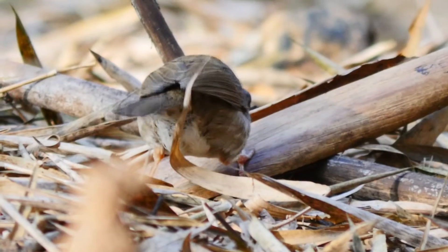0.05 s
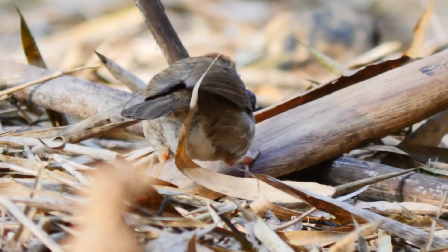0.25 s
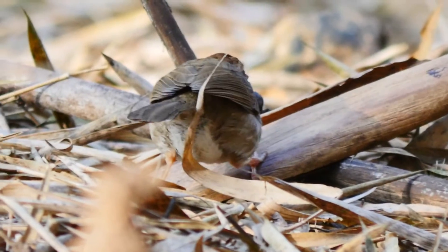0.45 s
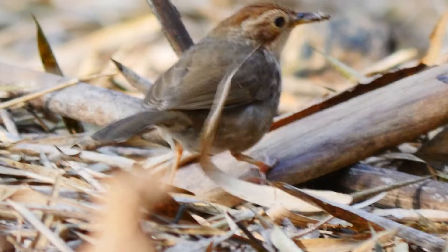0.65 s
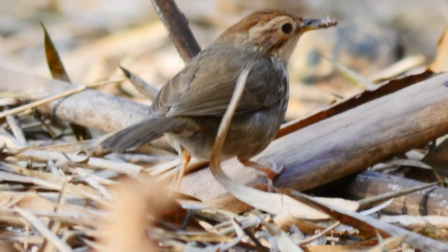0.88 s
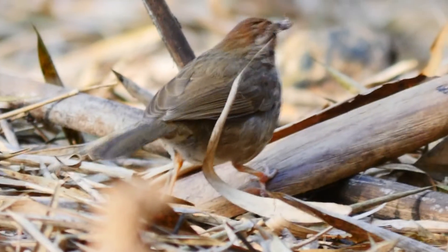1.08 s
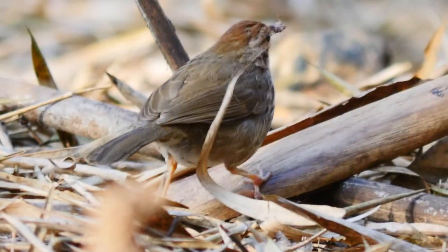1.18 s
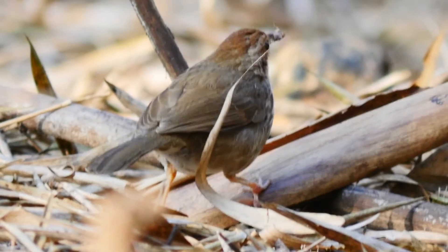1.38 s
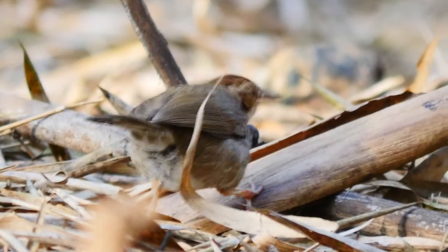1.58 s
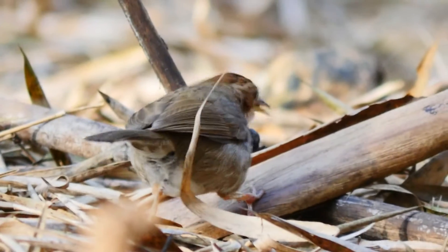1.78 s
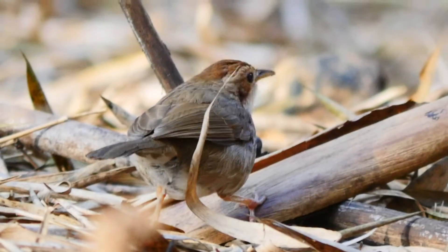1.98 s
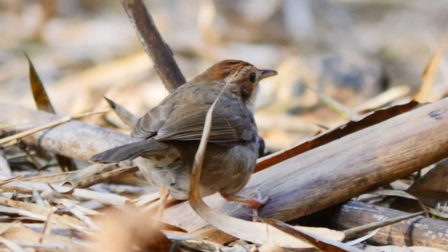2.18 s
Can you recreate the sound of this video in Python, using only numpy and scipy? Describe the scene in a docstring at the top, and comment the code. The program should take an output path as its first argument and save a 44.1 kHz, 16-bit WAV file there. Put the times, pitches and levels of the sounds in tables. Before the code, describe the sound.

A small bird forages close by in dry leaf litter, rustling, snapping a leaf, then shuffling with tiny cracks. Distant birds whistle and chirp faintly through the forest over a steady low rumble and a soft hiss of air.

```python
"""From the start, a steady far rumble and a faint hiss of air lie under distant birds, whose whistles
and chirps are scattered by the trees. Close by, a small bird forages in dry leaf litter.
At about 0.7 s it tugs at a leaf, which snaps, while a few low hoots sound far off on the left.
From about 1.3 s it shuffles and hops, with rustles and small cracks, as the far birds sing on."""
import sys
import numpy as np
from scipy import signal
from scipy.fft import rfft, irfft
from scipy.io import wavfile

SR = 44100
rng = np.random.default_rng(int(sys.argv[2]) if len(sys.argv) > 2 else 0)


def generate_wav(signal):
    """Clip the signal to [-1, 1] and save it as 16-bit WAV at the path in sys.argv[1]."""
    frames = np.transpose(np.atleast_2d(signal))
    scaled = np.clip(frames, -1, 1) * 32767
    pcm = np.round(scaled).astype(np.int16)
    wavfile.write(sys.argv[1], SR, pcm)


N = 99225  # 2.25 s
T = np.arange(N) / SR


def from_db(db):
    """Turn decibels into a number to multiply by."""
    return 10 ** (np.asarray(db) / 20)


def rms_one(x):
    """Scale a signal so that its average power is 1."""
    return x / np.sqrt(np.mean(x ** 2) + 1e-20)


def pan(db):
    """Share a sound between the ears: plus is to the left, minus to the right."""
    return rms_one(from_db([[db / 2], [-db / 2]]))


def drift(per_s):
    """A random wobble, about 1 in size, that heads for a new value per_s times a second."""
    return rms_one(np.interp(T * per_s, np.arange(N), rng.standard_normal(N)))


def colour(x, points):
    """Make some frequencies stronger and others weaker; white noise keeps its power."""
    size = 2 ** 17
    hz, db = np.transpose(points)
    bin_hz = np.arange(size // 2 + 1) * SR / size
    gain = rms_one(from_db(np.interp(np.log(bin_hz + 1), np.log(hz), db)))
    # these steps make the filter ring only after a sound, never before it
    cepstrum = irfft(np.log(gain))
    cepstrum[1:size // 2] *= 2
    cepstrum[size // 2 + 1:] = 0
    return irfft(rfft(x, size) * np.exp(rfft(cepstrum)))[..., :N]


def stereo_noise(likeness):
    """White noise for two ears: likeness 1 is the same in both, 0 unrelated, -1 opposite."""
    mid, side = rng.standard_normal((2, N))
    return np.sqrt((1 + likeness) / 2) * mid + np.sqrt((1 - likeness) / 2) * side * [[1], [-1]]


# tone of the far rumble: f/Hz, relative level/dB
RUMBLE_TONE = [(20, -48), (45, -27.5), (70, -9), (100, -2.5), (140, -1.5), (170, -4), (200, 0.5), (245, -3),
               (320, -9), (550, -11.5), (850, -16.5), (1500, -42.5), (4000, -34.5)]
# tone of the hiss of air: f/Hz, relative level/dB
AIR_TONE = [(100, -9.5), (500, 1.5), (850, 0.5), (1100, 8), (1500, -3), (2000, -1.5), (3100, -1.5),
            (4000, -11), (5200, -15), (7000, -6), (10000, -50), (16000, -24.5)]
def background():
    """A steady far rumble in the middle and the wide, faint hiss of the forest air."""
    rumble = from_db(-51.5) * colour(stereo_noise(1), RUMBLE_TONE)
    air = from_db(-56.5) * pan(-2.5) * colour(stereo_noise(-0.18), AIR_TONE)
    return rumble + air


# how loud the farthest birds are: t/s, level/dB
CHATTER_LOUDNESS = [(0, -58), (.2, -67), (.32, -56.5), (.48, -61), (.6, -61), (1.05, -58), (1.3, -59.5),
                    (1.45, -57.5), (1.6, -55.5), (1.76, -61), (1.97, -58), (2.25, -69)]
# tone of their chatter: f/Hz, relative level/dB
CHATTER_TONE = [(2400, -36.5), (3400, -2), (4000, 2.5), (4600, -3.5), (5400, -5.5), (6800, -25)]
def chatter():
    """The farthest birds blur into a soft wash of noise."""
    loudness = from_db(np.interp(T, *np.transpose(CHATTER_LOUDNESS)))
    return loudness * colour(stereo_noise(0), CHATTER_TONE)


def tree_echo(x, fade_s=0.85, build_s=0.009):
    """Countless small echoes off the trees build up, then die away by 60 dB in fade_s."""
    tail = stereo_noise(0) * from_db(-60 * T / fade_s) * (1 - np.exp(-T / build_s))
    return signal.fftconvolve(x, rms_one(tail) / np.sqrt(N), axes=-1)[:, :N]


def whistle(start, length, pitches, waver, fade_s=0.01):
    """One almost pure note that bends through three pitches and fades in and out."""
    progress = np.clip((T - start) / length, 0, 1)
    bend = np.polyfit([0, .5, 1], pitches, 2)
    hz = np.polyval(bend, progress) * (1 + waver)
    fade = np.clip(np.minimum(progress, 1 - progress) * length / fade_s, 0, 1)
    return np.sqrt(2) * np.sin(np.pi / 2 * fade) * np.sin(2 * np.pi * np.cumsum(hz) / SR)


# whistled notes: t/s, length/s, first f/Hz, middle f/Hz, last f/Hz, level/dB,
# left over right/dB, echo compared with the note/dB, waver/share of the pitch
WHISTLES = [(0.0, 0.089, 7330, 7330, 7500, -63, 2, -19, 0.0087),
            (0.287, 0.071, 3600, 3974, 4070, -58.5, 4, 2, .03),
            (.375, 0.05, 4700, 4320, 3620, -58, 11, 7, 0.023),
            (0.511, 0.033, 2956, 2450, 2480, -53.5, -20, 1, 0.028),
            (0.554, 0.049, 2600, 2458, 2650, -51.5, -8, 1.5, 0.03),
            (0.639, 0.053, 4340, 3977, 3340, -54, 10, 7, 0.011),
            (0.708, 0.049, 1700, 1856, 2230, -51.5, -12, 2, 0.035),
            (0.82, 0.047, 2590, 2608, 2580, -40, -16, -8, 0.0047),
            (0.874, 0.033, 2620, 2595, 2640, -47.5, 2, 2.5, 0.0029),
            (0.919, 0.031, 3456, 3433, 3460, -55, 18, 2.5, 0.015),
            (.935, 0.0535, 2050, 1610, 1680, -48, -13.5, -5, .02),
            (0.981, 0.044, 2000, 2200, 2120, -56, -8, 7, 0.025),
            (1.015, 0.05, 2620, 2600, 2624, -56.5, 2, -8, 0.012),
            (1.131, 0.036, 2475, 2990, 2450, -51.5, -12, 0, 0.0083),
            (1.181, 0.061, 3510, 3740, 4400, -64.5, 13, 4, .02),
            (1.263, .06, 2500, 2750, 2900, -60, 11, 0, .04),
            (1.41, 0.027, 1970, 2000, 2010, -57.5, -11, -3, 0.014),
            (1.389, 0.025, 3986, 4210, 4300, -56, 0, 6, 0.041),
            (1.411, 0.026, 3550, 4000, 4050, -53, -1, -1, 0.025),
            (1.433, 0.017, 4500, 4610, 4850, -52, 0, 3, 0.064),
            (1.482, 0.0165, 4170, 4540, 5070, -53, 3, 1, 0.018),
            (1.498, 0.034, 3244, 3870, 3880, -54, 1, 2.5, 0.0157),
            (1.503, 0.049, 1950, 1948, 2230, -59, -3, -1, 0.0131),
            (1.533, 0.0205, 3900, 4185, 4580, -47, -3, -3.5, 0.036),
            (1.555, 0.039, 4200, 4154, 3840, -55, -5, 4.5, 0.0507),
            (1.5, 0.25, 6800, 6980, 7080, -74.5, 11, 3, 0.008),
            (1.952, 0.24, 6900, 7130, 7480, -65.5, -2, -8, 0.006),
            (2.131, 0.1, 7380, 7570, 7650, -62.5, 1, -7, 0.0083),
            (2.084, 0.056, 4340, 3990, 3460, -62.5, 13, 8.5, 0.019),
            (2.116, 0.032, 5500, 4010, 2240, -59, -8, 5, 0.072),
            (2.12, 0.0347, 2816, 2504, 2480, -58, -10, 1.5, 0.021)]
# a run of low, falling hoots on the left: t/s, level/dB
LOW_HOOTS = [(0.658, -52), (0.687, -50.5), (0.724, -53.5), (.758, -47.5), (0.79, -50.5), (.826, -51)]
def far_birds():
    """Whistles and hoots arrive directly and, blurred in pitch, by way of the trees."""
    hoot_s, hoot_hz, hoot_pan_db, hoot_echo_db = 0.0272, 1081, 13, -4
    falling = hoot_hz * np.array([1.056, 1, 0.944])
    hoots = [(start, hoot_s, *falling, db, hoot_pan_db, hoot_echo_db, 0) for start, db in LOW_HOOTS]
    wobble, blur = drift(450), 0.0078 * drift(300)
    flutter = from_db(2 * drift(160))  # the loudness trembles
    direct, to_trees = np.zeros((2, 2, N))
    for start, length, *pitches, db, pan_db, echo_db, waver in WHISTLES + hoots:
        note = whistle(start, length, pitches, waver * wobble)
        blurred = whistle(start, length, pitches, waver * wobble + blur)
        direct += from_db(db) * flutter * note * pan(pan_db)
        to_trees += from_db(db + echo_db) * blurred * pan(pan_db / 2)
    return direct + tree_echo(to_trees)


# how loud the stirred leaves are: t/s, level/dB
RUSTLE_LOUDNESS = [(0, -57), (.2, -59), (.42, -55.5), (.47, -50.5), (.56, -55.5), (.64, -53), (.72, -50),
                   (.79, -61), (.93, -66.5), (1.22, -63), (1.28, -48.5), (1.36, -56), (1.46, -58),
                   (1.62, -59.5), (1.68, -53.5), (1.82, -52.5), (1.875, -45.5), (1.97, -58.5),
                   (2.25, -67.5)]
# tone of the rustle: f/Hz, relative level/dB
RUSTLE_TONE = [(1000, -14), (4000, -13.5), (6000, -11), (8000, -7.5), (9500, 1.5), (10500, 1),
               (13000, -3.5), (16000, -15)]
def rustle(crackles_per_s=5000, clumps_per_s=160):
    """Tiny crackles come in clumps and swell as the near bird shifts its weight."""
    hits = rng.random(N) < crackles_per_s / SR
    size_db = -3 * np.minimum(rng.exponential(1, N), 4)
    clump_db = 1.6 * drift(clumps_per_s)
    crackles = hits * from_db(size_db + clump_db) * stereo_noise(1)
    loudness = from_db(np.interp(T, *np.transpose(RUSTLE_LOUDNESS)))
    return loudness * rms_one(colour(crackles, RUSTLE_TONE))


# cracks of thin stalks: t/s, level/dB, fade time/s, ring f/Hz
STALK_CRACKS = [(.247, -26.5, 0.00089, 10250), (0.57, -42, .0015, 11900), (1.3876, -38, 0.0038, 10360),
                (1.59, -35.5, 0.002, 11600), (1.7911, -35.5, 0.0014, 10300), (1.833, -42, 0.0014, 10300),
                (1.9296, -35.5, 0.0012, 11100), (1.962, -45, 0.0038, 11000), (2.1152, -39, 0.0014, 12900)]
def stalk_cracks(width_hz=2530):
    """A thin stalk cracks: a very short burst of noise rings in one high band."""
    cracks = np.zeros(N)
    for start, db, fade_s, hz in STALK_CRACKS:
        burst = (T >= start) * np.exp(-np.abs(T - start) / fade_s) * rng.choice([-1, 1], N)
        stalk = signal.butter(2, [hz - width_hz / 2, hz + width_hz / 2], "band", fs=SR, output="sos")
        boost = np.sqrt(SR / 2 / width_hz)  # gives back the power that the filter takes
        cracks += from_db(db) * boost * signal.sosfilt(stalk, burst + 1e-18)
    return cracks


# snaps of dry leaves: t/s, level/dB, fade time/s, dull body compared with crisp ring/dB
LEAF_SNAPS = [(0.6545, -35, 0.0036, -14), (0.6835, -36, 0.0015, -10), (0.6855, -30, 0.002, -9),
              (0.6936, -18, 0.002, -17), (0.6965, -22, 0.0024, -17), (.7031, -21.5, .0028, -5),
              (.714, -45, .018, 2), (.731, -36, 0.0025, -6), (.809, -32.5, 0.0026, -12),
              (0.8569, -38, 0.0025, -11), (.884, -42, .003, -9), (0.932, -45, 0.0089, -1),
              (1.873, -42, 0.006, -8), (1.934, -56, 0.01, 11)]
# the leaves' crisp ring: f/Hz, relative level/dB
RING_TONE = [(2000, -17.5), (5500, -12.5), (7200, 0), (7850, -7.5), (8400, 3), (9200, -4.5), (10300, 5.5),
             (11200, -2.5), (12400, -2.5), (16000, -14)]
# the part of that ring that spreads to the sides: f/Hz, relative level/dB
SIDE_TONE = [(4500, -13), (7300, 6), (10000, 0), (13000, -12)]
# the leaves' dull body: f/Hz, relative level/dB
BODY_TONE = [(500, -12), (1100, 7.5), (2500, -0.5), (4700, 12.5), (6000, -24), (12000, -53)]
def leaf_snaps(rise_s=0.00018, settle_db=-18.5, settle_s=0.3):
    """Each snap is a burst of tearing fibres, coloured by the leaf, that fades as the litter settles."""
    ring_power, body_power = np.zeros((2, N))
    fibres = rms_one(from_db(3 * np.clip(drift(2500), -2, 2)))
    for start, db, fade_s, body_db in LEAF_SNAPS:
        since = np.abs(T - start)
        burst = fibres * (1 - np.exp(-since / rise_s)) * np.exp(-since / fade_s)
        settling = from_db(settle_db - 60 * since / settle_s)
        power = from_db(db) ** 2 * (T >= start) * (burst ** 2 + settling ** 2)
        ring_power += power
        body_power += power * from_db(body_db) ** 2
    ahead, sideways = np.sqrt(ring_power) * rng.choice([-1, 1], (2, N))
    ring = colour(ahead, RING_TONE)
    sides = from_db(-7.5) * colour(sideways, SIDE_TONE) * [[1], [-1]]
    body = pan(-6) * colour(np.sqrt(body_power) * stereo_noise(-0.55), BODY_TONE)
    return ring + sides + body


# the microphone pair's balance in the top treble: f/Hz, left over right/dB
MIC_BALANCE = [(11000, 0), (13000, -5)]
def brighter_right_mic(x):
    """The right microphone is brighter in the top treble; applied to the near leaf sounds."""
    db = np.interp(np.arange(N // 2 + 1) * SR / N, *np.transpose(MIC_BALANCE))
    return irfft(rfft(x) * from_db([db / 2, -db / 2]), N)


def scene():
    """The near bird in the leaves, the far birds and the background, all together."""
    litter = brighter_right_mic(leaf_snaps() + stalk_cracks() + rustle())
    return litter + far_birds() + chatter() + background()


def record(dry):
    """Cut away the very highest treble, steeply."""
    cutoff_hz = 15700
    return signal.sosfilt(signal.ellip(10, .2, 70, cutoff_hz, fs=SR, output="sos"), dry)


dry = scene()
out = record(dry)
generate_wav(out)
```